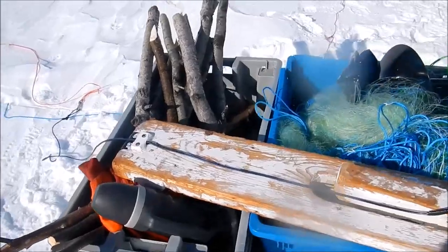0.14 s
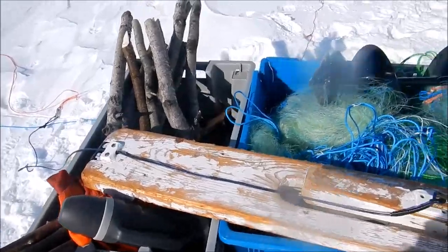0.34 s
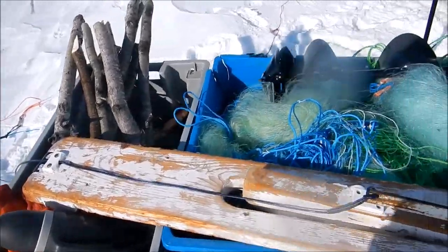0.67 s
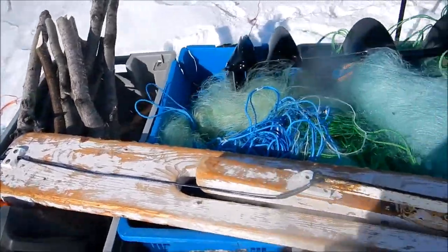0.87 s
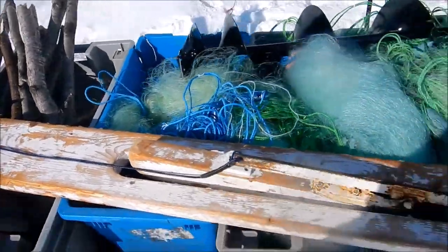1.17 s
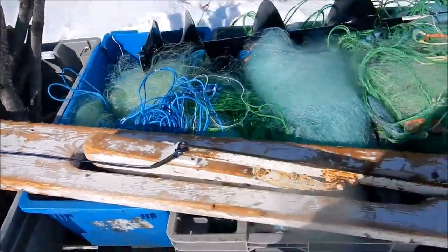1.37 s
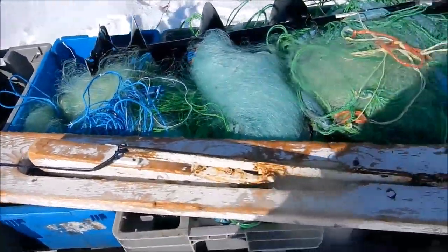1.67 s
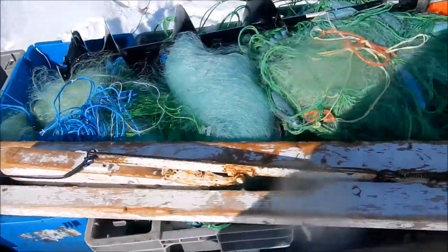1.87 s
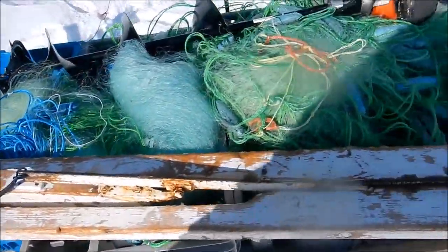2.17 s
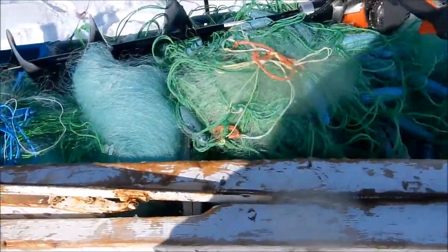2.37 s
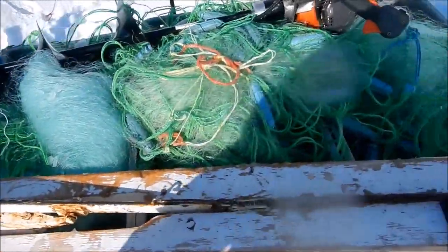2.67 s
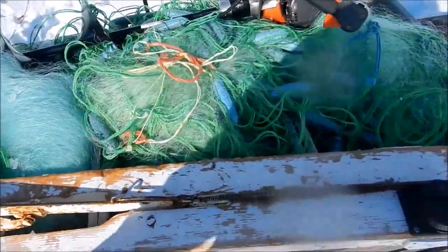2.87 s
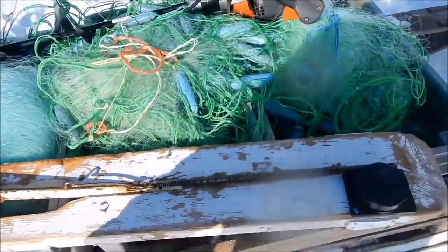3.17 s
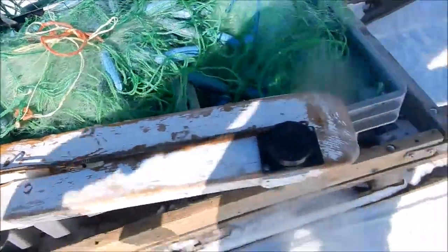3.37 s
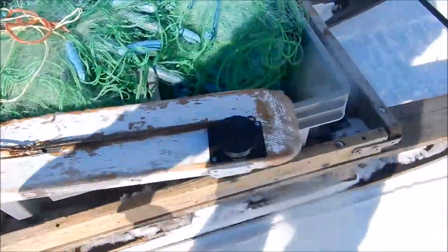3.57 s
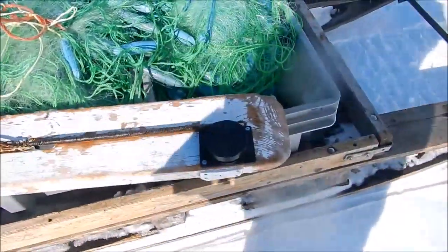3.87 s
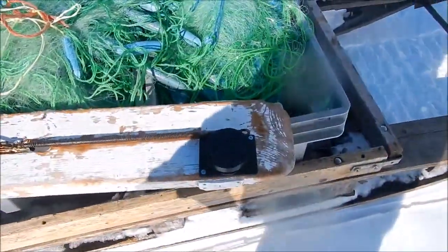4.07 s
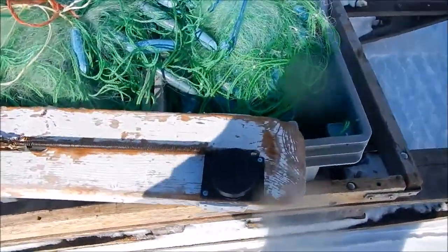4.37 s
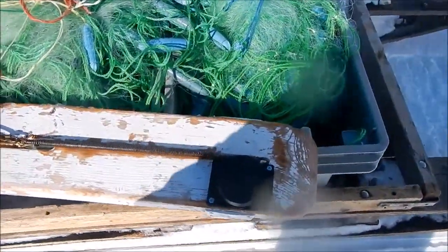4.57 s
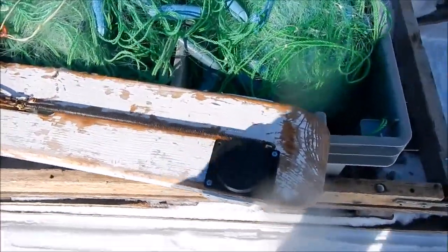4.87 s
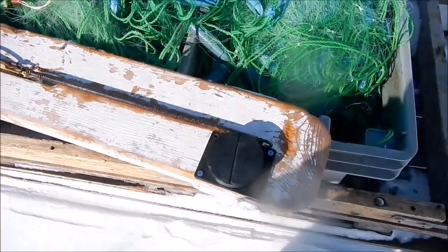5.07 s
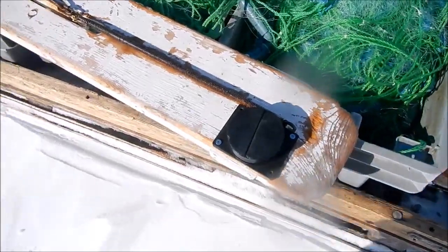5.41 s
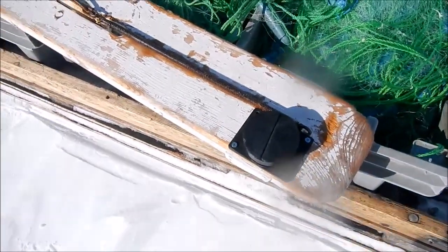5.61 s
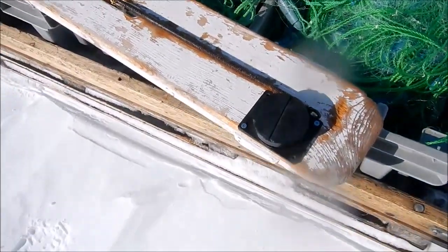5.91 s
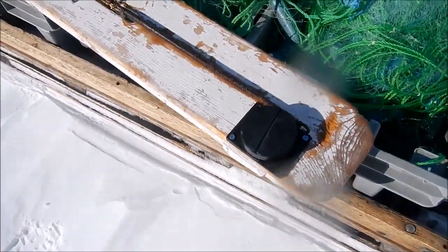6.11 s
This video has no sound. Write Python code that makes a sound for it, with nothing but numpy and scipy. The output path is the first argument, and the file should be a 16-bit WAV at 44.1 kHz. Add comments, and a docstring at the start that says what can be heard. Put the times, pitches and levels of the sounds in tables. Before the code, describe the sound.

A shovel clears slush from an ice hole: snowy crunches, one big wet pouring splash, then three ringing chops and gritty scrapes.

```python
"""Shovelling slush out of an ice hole

A shovel clears slush from a hole in lake ice, a few steps from a camera in a housing. Packed snow
crunches and thuds, wet slush pours out with a splash, the blade chops three times and scrapes up more.
Ice chips click, drops plink and water trickles throughout. Shaped noise makes the rough sounds;
short, dying sine tones make the bubbles, drops, thuds and ringing metal."""
import sys
import numpy as np
from scipy import signal
from scipy.fft import rfft, irfft, next_fast_len
from scipy.io import wavfile
from scipy.ndimage import map_coordinates

SR = 44100
rng = np.random.default_rng(int(sys.argv[2]) if len(sys.argv) > 2 else 0)


def inscribe(sig):
    """Save sig as 16-bit PCM at rate SR to the path in sys.argv[1].

    A 1-D sig is mono; a 2-D sig holds one channel per row.
    Samples are clipped to [-1, 1] before scaling.
    """
    pcm = np.round(np.clip(np.atleast_2d(sig).T, -1, 1) * 32767)
    wavfile.write(sys.argv[1], SR, pcm.astype(np.int16))


N = 275625
TOP_HZ = 15900  # nothing above this is heard

# Chops of the blade into ice. Each row: start of full strength in seconds, level in dB before mixing,
# rise in seconds, hold in seconds, time to fall 60 dB in seconds, chips in dB relative to the chop,
# pitch of the cavity in Hz.
CHOPS = [(4.166, -19, 0.0058, 0.0085, 0.098, -7.5, 1724), (4.775, -13.5, 0.0027, 0.0014, .12, -2.5, 1816),
         (5.118, -17.5, 0.0074, 0.011, 0.11, 1.5, 1374)]
# Tone of fizzing, crumbling ice. Each row: frequency in Hz, relative level in dB per Hz.
FIZZ = [(1500, -20), (2800, 3), (3700, -1), (5600, -1), (6700, -5.5), (7800, -17.5), (9500, -26),
        (11500, -27), (16000, -42)]


def slush():
    """Wet ice slides and pours in clumps: sloshing water, a gritty splash, scraping, fizz and spray."""
    # Movements of slush: the load drains in one long swell, clumps slide and pour, the blade scrapes.
    # Each row: peak time in seconds, splash in dB, rise in seconds, fall in seconds, fizz in dB, slosh in dB.
    drain = (3, -35.5, 1.5548, 0.69, -31.5, -48)
    surges = [(0.01, -39.5, 0.12, .06, -40, -38.5), (0.075, -50, 0.081, 1, -51, -58),
              (0.73, -45, 0.15, 0.15, -45, -55.5), (1.325, -46, 0.34, .18, -45, -53),
              (1.445, -42, 0.2, 0.12, -47.5, -50.5), (1.605, -44.5, .1, 0.55, -48.5, -48.5),
              (1.818, -45, 0.094, 0.065, -38, -50), (2.205, -34, 0.12, 0.16, -43, -47),
              (2.443, -38, 0.044, 0.044, -38, -59), (2.743, -25.5, 0.13, 0.27, -33.5, -38.5),
              (3.0, -19.5, 0.12, 0.23, -25, -40), (3.065, -18, 0.19, 0.17, -32, -47),
              (3.252, -32, 0.3, 0.28, -36.5, -39), (3.7, -46.5, 0.66, 0.35, -52.5, -46),
              (3.907, -51, .25, 0.14, -63, -48.5)]
    scrapes = [(0.577, -41, 0.33, 0.15, -45, -51.5), (0.905, -39, 0.17, 0.13, -46, -46.5),
               (4.112, -45, .11, 0.34, -49, -43.5), (4.385, -38, 0.043, 0.027, -37.5, -54),
               (4.431, -32.5, 0.047, 0.16, -35.5, -61), (4.51, -41, 0.073, 0.052, -35.5, -49),
               (4.775, -37.5, 0.11, 0.13, -37, -39), (5.135, -41, 0.4, 0.11, -45, -39),
               (5.495, -31, 0.19, 0.31, -34.5, -44), (5.576, -37, 0.19, 0.29, -37, -37.5),
               (5.693, -37, .04, 0.072, -45, -41.5), (5.925, -35.5, 0.24, 0.15, -39, -43.5),
               (6.03, -41.5, 0.042, 0.55, -45.5, -49)]
    # Tones of the layers. Each row: frequency in Hz, relative level in dB per Hz.
    slosh_tone = [(120, -14), (250, -16.5), (360, 2.5), (520, -1.5), (760, -3), (1100, -4.5), (2000, -37)]
    splash_tone = [(400, -21.5), (700, -5), (1080, -2), (1600, 0.5), (2200, 0.5), (3000, -5), (4200, -21),
                   (8000, -62)]
    spray_tone = [(6000, -21), (8000, 3), (11500, -2.5), (16000, -6)]
    trickle_db = [[-54.5], [-62], [-79.5]]  # steady slosh, splash and fizz of trickling water
    pour_contact, scrape_contact = 0.073, 0.34  # share of splash power that rings the blade (0-1)

    poured = flow([drain] + surges) ** 2
    scraped = flow(scrapes) ** 2
    power = poured + scraped + amp(trickle_db) ** 2
    slosh_gain, splash_gain, fizz_gain = np.sqrt(power)
    ringing_power = pour_contact * poured[1] + scrape_contact * scraped[1]
    contact = np.clip(ringing_power / power[1], 0, 1)

    clumps = unit(amp(1.3 * wobble(45)))
    grains = clumps * grit(rate=650, spread_db=-3.0, life=0.017)
    slosh = coloured(hiss() * grit(rate=230, spread_db=8, life=0.025), slosh_tone)
    slosh[0] += amp(-13) * bubbles(count=300, centre_hz=492, spread=0.362, cycles=6.2)
    splash = coloured(hiss() * grains, splash_tone)
    splash[0] += amp(-5.5) * bubbles(count=2000, centre_hz=1421, spread=0.518, cycles=14.8)
    scraping = blade(hiss() * grains)
    splash = np.sqrt(1 - contact) * splash + np.sqrt(contact) * scraping
    fizz = coloured(hiss() * grains, FIZZ)
    fizz[0] += amp(-5.5) * bubbles(count=3000, centre_hz=4250, spread=0.37, cycles=11.2)
    # only freely falling water throws fine spray
    fizz += amp(-20) * (1 - contact) ** 2 * coloured(hiss() * grains, spray_tone)
    return slosh_gain * slosh + splash_gain * splash + fizz_gain * fizz


def flow(moves):
    """Gains of the slosh, splash and fizz that these movements stir up."""
    stirred = []
    for s, splash_db, rise, fall, fizz_db, slosh_db in moves:
        stirred.append(swell(s, rise, fall) * amp([[slosh_db], [splash_db], [fizz_db]]))
    return np.array([together(layer) for layer in zip(*stirred)])


def packed_snow():
    """Snow rumbles as it gives under shifting weight, and collapses in short, gritty crunches."""
    # Weight shifts. Each row: peak time in seconds, rumble in dB, length of the fall in seconds.
    loads = [(0.01, -46, 0.15), (0.54, -55, .14), (0.766, -54, .14), (0.916, -50, 0.13),
             (1.592, -60, 0.067), (1.713, -55, 0.074), (2.19, -51, 0.13), (2.547, -52, .2),
             (2.712, -41, 0.14), (3.02, -41, 0.24), (3.263, -48.5, 0.18), (3.57, -48.5, 0.14),
             (3.728, -49, .1), (4.17, -48.5, 0.16), (4.377, -58, .1), (4.85, -45.5, 0.15),
             (5.13, -45, 0.15), (5.55, -41, 0.21), (5.818, -51, .1), (5.91, -55, 0.071),
             (6.056, -45.5, 0.12)]
    # Crunches of snow and slush. Each row: start in seconds (full strength 4.1 ms later),
    # level in dB before mixing, treble in dB relative to the crunch, time to fall 60 dB in seconds.
    crunches = [(0.052, -19.5, -15, 0.077), (0.651, -19.5, -14, 0.073), (0.707, -16.5, -13.5, 0.062),
                (0.955, -17, -11, 0.025), (1.04, -22, -14.5, 0.033), (1.12, -27, -14.5, 0.036),
                (1.223, -28.5, -18, 0.023), (1.254, -29.5, -27, 0.02), (1.286, -30, -18, 0.032),
                (2.147, -24, -24, 0.03), (2.182, -22, -35, 0.03), (2.194, -39, -21, 0.046),
                (2.262, -31.5, 2.5, 0.036), (2.287, -22, -8, 0.034), (2.419, -33, -1, 0.042),
                (2.744, -31, -8.5, 0.021), (2.82, -22, -3, 0.026), (2.987, -9, -16, 0.037),
                (3.105, -14.5, -11.5, 0.072), (4.043, -27.5, -23, 0.032), (4.158, -20, 1.5, 0.087),
                (4.41, -26.5, 0, 0.045), (4.429, -24.5, -10, 0.027), (5.686, -24, -22, 0.047),
                (5.735, -43, 0, 0.023), (5.786, -21, -20, 0.03), (5.812, -34, -3.5, 0.047),
                (5.896, -25, -5, 0.055), (5.922, -24.5, -30, 0.02), (5.945, -31, -9, 0.045),
                (6.024, -21.5, -18.5, 0.057), (6.047, -29.5, -19, 0.063)]
    # Tones of crunch and rumble. Each row: frequency in Hz, relative level in dB per Hz.
    crush_tone = [(80, -15), (200, -10), (400, -3.5), (900, 2.5), (1400, -3), (2200, 5), (3200, -5),
                  (5000, -8.5), (9000, -34.5)]
    rumble_tone = [(20, -30), (45, -28), (100, 5.5), (190, 4.5), (290, -13), (600, -2), (1500, -60)]
    steady_rumble_db = -72.5  # goes with the trickling water

    shifts = [amp(db) * swell(s, 0.78 * length, length) for s, db, length in loads]
    load = together([amp(steady_rumble_db)] + shifts)
    body, edge = np.zeros(N), np.zeros(N)
    for s, db, treble_db, t60 in crunches:
        crush = amp(db) * burst(s + 0.0041, rise=0.004, hold=0.0016, t60=t60)
        body += crush
        edge += crush * amp(treble_db)
    grains = grit(rate=2000, spread_db=3, life=.0014)
    crunch = amp(-7.0) * coloured(hiss() * grains * body, crush_tone)
    crunch += amp(-1) * coloured(hiss() * grains * edge, FIZZ)
    return crunch + load * coloured(hiss(), rumble_tone)


def chops():
    """The blade bites through ice: fractures ring it and the cavity it opens; each chop repeats faintly."""
    body, edge, hollow = np.zeros(N), np.zeros(N), np.zeros(N)
    for s, db, rise, hold, t60, chips_db, cavity_hz in CHOPS:
        bite = amp(db) * burst(s, rise, hold, t60)
        crumble = amp(db) * burst(s, rise, hold, 0.67 * t60)
        repeat = amp(db) * burst(s + 0.0882, rise=0.011, hold=0.0036, t60=0.046)
        body += bite + amp(-17.0) * repeat
        edge += amp(chips_db) * (crumble + amp(-17.5) * repeat)
        # the tone of the cavity wavers at random
        phase = 2 * np.pi * cavity_hz * np.arange(N) / SR + 2.44 * wobble(110)
        hollow += bite * np.sin(phase)
    grains = grit(rate=3900, spread_db=-3.5, life=0.00067)
    out = amp(-4) * blade(hiss() * grains * body)
    out += amp(-1.0) * coloured(hiss() * grains * edge, FIZZ)
    out[0] += amp(-6.5) * hollow
    return out * amp([[0], [-3]])  # the part that sets the ports apart is weaker


def blade(x):
    """White sound rings the damped modes (natural tones) of the shovel, keeping its power."""
    # Tones of the blade. Each row: pitch in Hz, width in Hz, relative level in dB.
    blade_modes = [(364, 55, -8.5), (700, 95, -3.5), (1076, 250, -4.5), (1264, 64, 1), (1376, 66, -2),
                   (1590, 110, -2.5), (1812, 72, 3.5), (2025, 520, -6), (2600, 600, -9)]

    def modes(hz):
        total = 0
        for k, (centre, width, db) in enumerate(blade_modes):
            damping = 1j * hz * width
            sign = (-1) ** k  # neighbouring modes move oppositely
            total = total + sign * amp(db) * damping / (centre * centre - hz * hz + damping)
        return unit(total)

    return filtered(x, modes)


def ringing():
    """Each chop sets the blade's modes ringing, in slightly different proportions."""
    # Tones that ring on. Each row: pitch in Hz, relative level in dB, time to fall 60 dB in seconds.
    ring_modes = [(683, -6, .22), (1068, -9, .13), (1206, 1.5, 0.23), (1389, -1, 0.13), (1685, -3, .12),
                  (1780, 2, .1), (2144, -13, 0.11)]
    ring_db = -15.5  # relative to the chop
    out, t = np.zeros((2, N)), np.arange(SR // 4) / SR
    for s, db, *_ in CHOPS:
        ring = np.zeros(len(t))
        for hz, level, t60 in ring_modes:
            fading = amp(level + rng.normal(0, 2) - 60 * t / t60)
            ring += fading * np.sin(2 * np.pi * (hz * t + rng.random()))
        add(out[0], s, amp(db + ring_db) * ring)
    return out


def chips():
    """Loose chips of ice click in a broad band around their pitch."""
    # Single clicks. Each row: start in seconds, level in dB before the fade, pitch in Hz.
    chip_clicks = [(1.819, -26, 5200), (1.845, -25, 2480), (1.912, -28.5, 3920), (2.028, -25, 2450),
                   (2.075, -27, 3720), (2.332, -31, 5250), (2.369, -23.5, 3840), (2.381, -27, 4500),
                   (2.41, -23, 3840), (2.424, -20, 2250), (2.534, -24, 2960), (3.401, -22, 2010),
                   (3.477, -47, 4550), (3.914, -35.5, 5960), (4.031, -42, 6150), (4.506, -26.5, 5140),
                   (5.289, -38.5, 5260), (5.375, -37.5, 5450), (5.398, -44, 4000), (5.46, -16, 5000),
                   (5.763, -36, 5240), (5.903, -21.5, 3400), (6.108, -40, 4000), (6.228, -29, 7350)]
    out, t = np.zeros((2, N)), np.arange(SR // 20) / SR
    for s, db, hz in chip_clicks:
        band = signal.butter(4, [.6 * hz, min(1.3 * hz, TOP_HZ)], "band", fs=SR)
        click = unit(signal.lfilter(*band, rng.standard_normal((2, len(t)))))
        fading = amp(db - 60 * t / .022)
        add(out, s, fading * (1 - np.exp(-t / .0008)) * click)
    return out


def thuds():
    """Weight on the ice gives a low, damped push; wet lumps land with a short knock and a noisy slap."""
    # Dull thuds through the ice, then landing lumps of slush.
    # Each row: start in seconds, base level in dB (adjusted below), pitch in Hz.
    ice_thuds = [(0.059, -28.5, 174), (0.561, -43, 131), (0.657, -37.5, 207), (0.716, -31.5, 126),
                 (0.957, -29.5, 159), (1.045, -34.5, 142), (1.577, -46.5, 114), (1.709, -47, 132),
                 (2.151, -37.5, 158), (2.207, -35, 220), (2.676, -22.5, 135), (3.527, -30, 158),
                 (3.602, -38.5, 317), (3.736, -27, 156), (4.383, -33.5, 157), (4.78, -29.5, 153),
                 (5.124, -32.5, 134), (5.475, -42, 207), (5.576, -36, 116), (6.026, -39, 126)]
    slush_lumps = [(2.211, -26, 424), (2.534, -24.5, 590), (2.675, -12, 964), (3.524, -25, 420),
                   (3.735, -29, 610)]
    out, t = np.zeros((2, N)), np.arange(SR // 8) / SR
    for s, db, hz in ice_thuds:
        fading = amp(db + 9.5 - 60 * t / 0.037)
        add(out[0], s, fading * (1 - np.exp(-t / 0.0017)) * np.sin(2 * np.pi * hz * t))
    for s, db, hz in slush_lumps:
        knock = amp(4 - 60 * t / .024) * np.sin(2 * np.pi * hz * t)
        band = signal.butter(2, [.5 * hz, hz + 900], "band", fs=SR)
        slap = amp(-2 - 60 * t / .035) * unit(signal.lfilter(*band, rng.standard_normal(len(t))))
        add(out[0], s, amp(db) * (knock + slap))
    return out


def drips():
    """Drops fall back into the water; each traps a bubble that rings briefly as its pitch rises."""
    # Drops. Each row: start in seconds, base level in dB (raised below), starting pitch in Hz.
    drops = [(.143, -37, 1094), (.171, -44, 3650), (.204, -34, 3030), (1.158, -40, 690), (1.708, -45, 716),
             (1.982, -31.5, 1600), (2.028, -27, 2146), (2.44, -33, 1280), (3.401, -28.5, 1895),
             (3.574, -35.5, 2040), (3.584, -29.5, 2900), (3.62, -38, 1294), (5.7, -26, 1125)]
    out, t = np.zeros((2, N)), np.arange(SR // 12) / SR
    for s, db, hz in drops:
        fading = amp(db + 3.5 - 60 * t / 0.039)
        tone = np.sin(2 * np.pi * hz * t * (1 + 3 * t))
        add(out[0], s, fading * (1 - np.exp(-t / 0.0012)) * tone)
    return out


def air():
    """A faint, smooth, steady hiss lies under everything."""
    # Tone of the hiss. Each row: frequency in Hz, relative level in dB per Hz.
    air_tone = [(100, -9), (400, -2), (2000, -0.5), (5500, -12), (8000, -9.5), (15000, -18)]
    return amp(-61) * coloured(hiss(), air_tone)


def bubbles(count, centre_hz, spread, cycles):
    """Small bubbles of mixed size ring for a few cycles and rise slightly in pitch; rms 1."""
    when = rng.random(count)
    pitch = rng.uniform(-0.989, 1, count)
    size = rng.exponential(1, count)
    hz = centre_hz * np.exp(spread * pitch)[:, None]
    n = np.arange(int(3 * cycles * SR / centre_hz))
    turns = hz * n / SR
    age = turns / cycles
    ring = np.sin(2 * np.pi * turns * (1 + .015 * np.minimum(age, 2))) * np.exp(-age)
    ring *= np.minimum(size, 4)[:, None]
    ring *= (1 - np.exp(-turns)) * (1 - n / len(n))  # soft start and end
    places = (when * N).astype(int)[:, None] + n
    return unit(np.bincount(places.ravel(), ring.ravel(), N)[:N])


def grit(rate, spread_db, life):
    """Envelope (rms 1) of tiny fractures: rate a second, random sizes, a decay of life seconds."""
    sizes = amp(spread_db * np.clip(rng.standard_normal(N), -2, 2)) ** 2
    fractures = sizes * (rng.random(N) < rate / SR)
    energy = signal.lfilter([1], [1, -np.exp(-2 / (life * SR))], fractures)
    return unit(np.sqrt(energy + .12 * energy.mean()))  # never quite silent


def hiss():
    """White noise: a part that both ports share and a part that sets them apart."""
    return rng.standard_normal((2, N))


def burst(s, rise, hold, t60):
    """A burst that is at full strength from time s, holds briefly and dies away."""
    t = np.arange(N) / SR - s
    growing = np.minimum(t / rise, 0)
    dying = -np.log(1000) * (t - hold) / t60
    return np.exp(np.maximum(np.minimum(growing, dying), -20))


def swell(s, rise, fall):
    """Gain of a movement that peaks at time s, changing evenly by 20 dB per rise or fall time."""
    t = np.arange(0, N, 64) / SR - s  # one value every 64 samples
    return amp(20 * np.minimum(t / rise, -t / fall))


def together(gains):
    """The joint gain of unrelated movements (their powers add), one value per sample."""
    joint = np.sqrt(sum(g ** 2 for g in gains))
    return np.interp(np.arange(N), np.arange(0, N, 64), joint)


def wobble(rate):
    """A smooth random curve through rate random points a second."""
    knots = rng.standard_normal(1000)
    return map_coordinates(knots, [np.arange(N) * rate / SR], mode="mirror")


def amp(db):
    """Decibels to gain."""
    return 10 ** (np.asarray(db) / 20)


def unit(x):
    """x at rms 1 (rms is the average strength)."""
    return x / np.sqrt(np.mean(abs(x) ** 2) + 1e-20)


def along(points, hz):
    """Read a curve of (Hz, value) points on a log frequency axis."""
    f, v = np.transpose(points)
    return np.interp(np.log(hz + 1), np.log(f + 1), v)


def filtered(x, response):
    """Multiply the spectrum of x by a response that depends on frequency."""
    m = 2 * next_fast_len(N // 2 + SR // 4)  # spare room after the end
    return irfft(rfft(x, m) * response(np.fft.rfftfreq(m, 1 / SR)), m)[..., :N]


def coloured(x, spectrum):
    """Shape white sound to a spectrum, keeping its power."""
    return filtered(x, lambda hz: unit(amp(along(spectrum, hz))))


def causal(db):
    """The minimum-phase response with these gains: it acts after a sound, never before."""
    cepstrum = irfft(np.log(amp(db)))
    half = len(cepstrum) // 2
    cepstrum[1:half] *= 2
    cepstrum[half + 1:] = 0
    return np.exp(rfft(cepstrum))


def add(track, s, sound):
    """Mix a sound in at time s."""
    start = max(round(s * SR), 0)
    track[..., start:start + sound.shape[-1]] += sound[..., :max(N - start, 0)]


def reflected(x):
    """Nearby surfaces add a few quick, duller copies, which ripple the spectrum."""
    # Early reflections. Each row: delay in seconds, signed gain before dulling.
    reflections = [(.00609, -.19), (.0107, .06), (.0163, .05)]

    def response(hz):
        copies = sum(gain * np.exp(-2j * np.pi * hz * delay) for delay, gain in reflections)
        return 1 + copies / np.sqrt(1 + (hz / 3500) ** 2)

    return filtered(x, response)


def two_ports(sound):
    """Two close ports hear a shared part plus or minus a differing part, mixed by frequency."""
    # Likeness of the ports. Each row: frequency in Hz, left-right likeness (1 is identical).
    alike = [(60, 0.72), (300, 0.81), (1200, 0.91), (2200, 0.84), (3500, 0.46), (6000, 0.68), (9000, 0.1),
             (15000, 0.13)]

    def shares(hz):
        angle = np.arccos(np.clip(along(alike, hz), -1, 1)) / 2
        return np.array([np.cos(angle), np.sin(angle)])

    mid, side = filtered(sound, shares)
    return np.array([mid + side, mid - side])


def turned(pair):
    """The turning camera shades one side's treble more than the other's; the left leads by 10 us."""
    # Turning of the camera. Each row: time in seconds, left minus right treble in dB.
    turn = [(0.0, -1), (0.21, -4), (0.55, -1.5), (1.0, 0), (1.35, -1.5), (3.25, -1.5), (3.76, 2.5),
            (4.8, 0), (5.3, -2), (5.42, -4), (6.25, -3)]
    seconds, balance_db = np.transpose(turn)
    pan_db = np.interp(np.arange(N) / SR, seconds, balance_db)
    treble = filtered(pair, lambda hz: hz ** 4 / (hz ** 4 + 2600 ** 4))
    sides = np.array([[1], [-1]])
    panned = treble * amp([pan_db / 2, -pan_db / 2])
    return pair - treble + filtered(panned, lambda hz: np.exp(1j * np.pi * hz * .00001 * sides))


def scene():
    """All sounds and their reflections reach two close ports on a turning camera."""
    sound = slush() + packed_snow() + chops() + ringing()
    sound += chips() + thuds() + drips() + air()
    return turned(two_ports(reflected(sound)))


def record(dry):
    """The housing carves peaks and notches; the camera cuts deep bass and all above its band limit."""
    # Peaks and notches of the housing. Each row: centre in Hz, half width in Hz, gain in dB.
    resonances = [(892, 140, -5.5), (2542, 20.5, -13.5), (2825, 275, -7.5), (3195, 63, -23),
                  (3810, 314, 6.5), (4300, 325, -8), (4964, 26, -16), (5320, 125, 5), (7480, 350, -3),
                  (9800, 140, -6)]

    def housing(hz):
        gain_db = sum(db / (1 + ((hz - centre) / width) ** 2) for centre, width, db in resonances)
        return causal(gain_db) * (hz < TOP_HZ)

    thinned = signal.lfilter(*signal.butter(2, 65, "high", fs=SR), dry)
    return filtered(thinned, housing)


dry = scene()
out = record(dry)
inscribe(out)
```